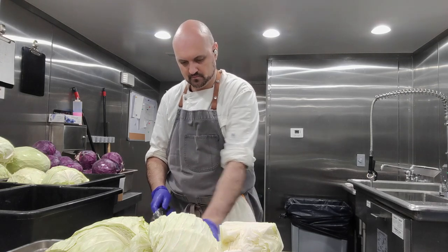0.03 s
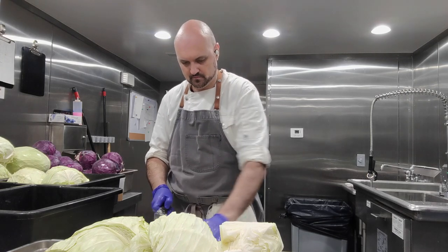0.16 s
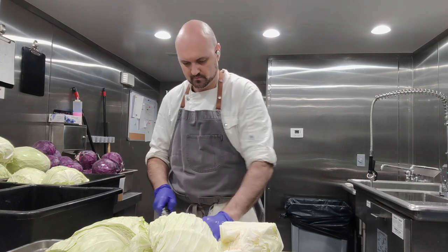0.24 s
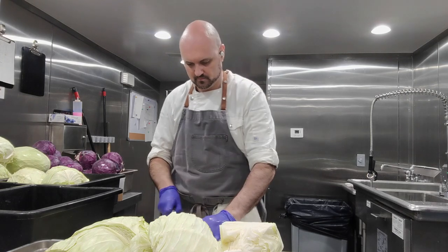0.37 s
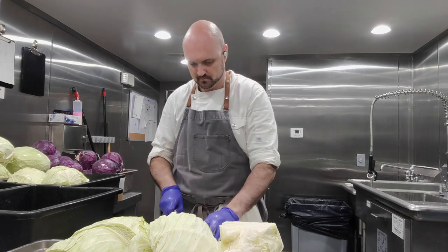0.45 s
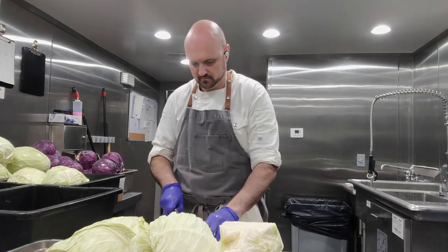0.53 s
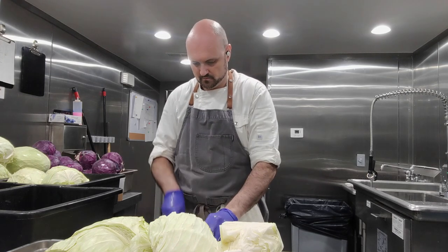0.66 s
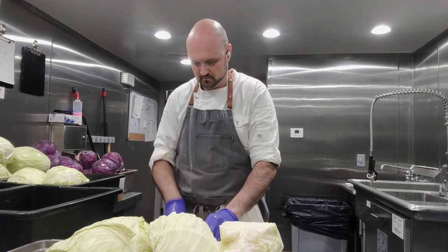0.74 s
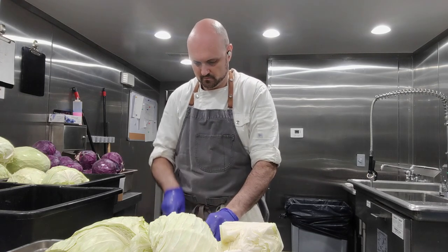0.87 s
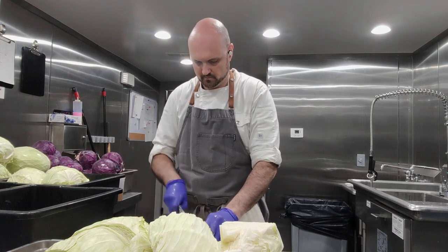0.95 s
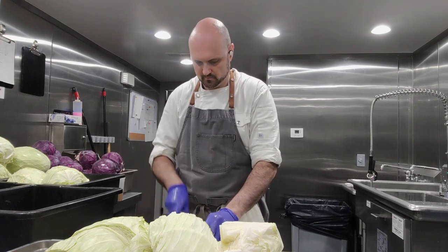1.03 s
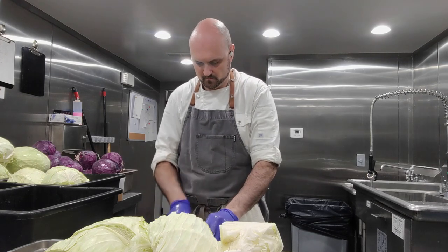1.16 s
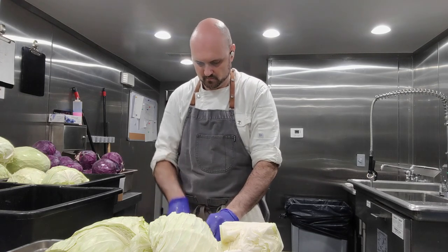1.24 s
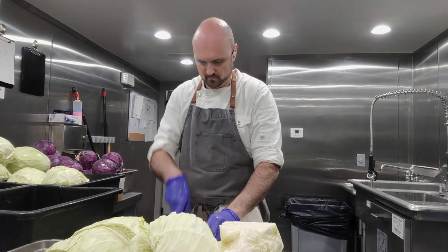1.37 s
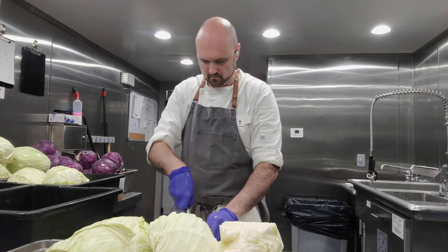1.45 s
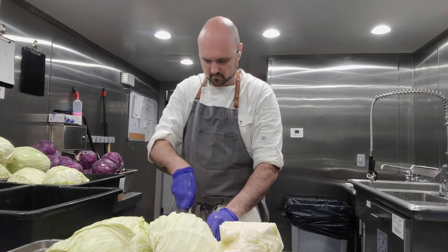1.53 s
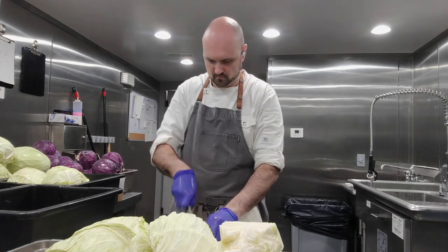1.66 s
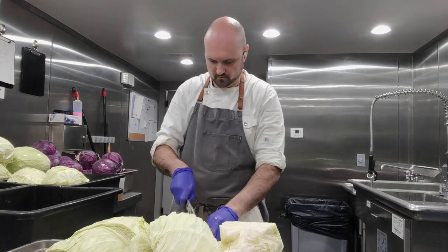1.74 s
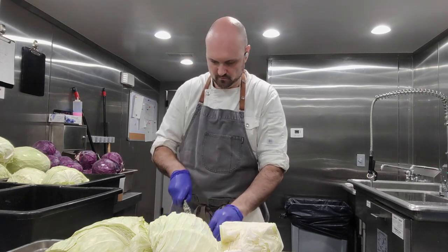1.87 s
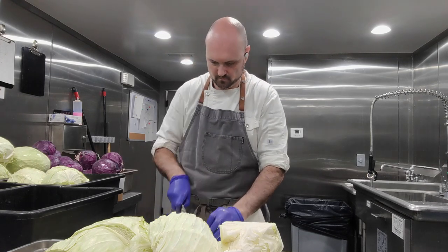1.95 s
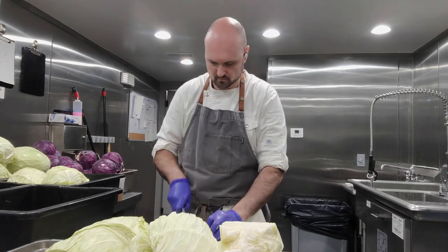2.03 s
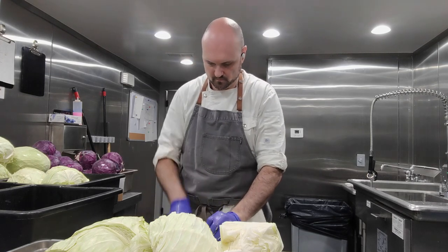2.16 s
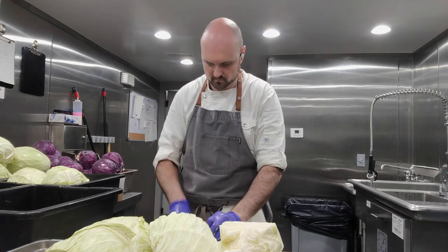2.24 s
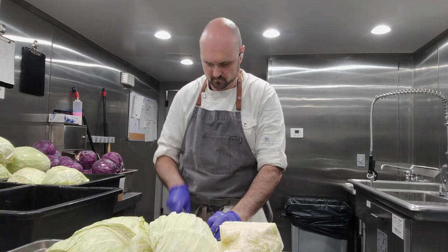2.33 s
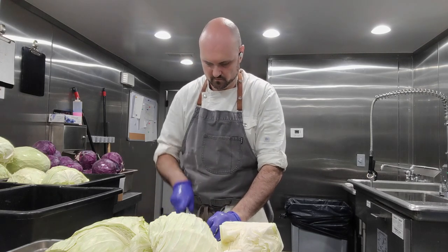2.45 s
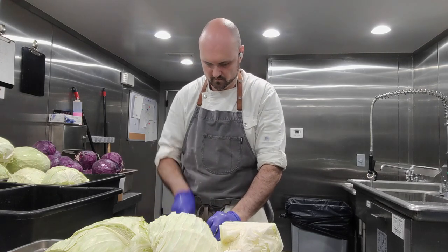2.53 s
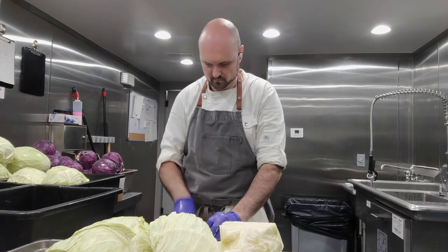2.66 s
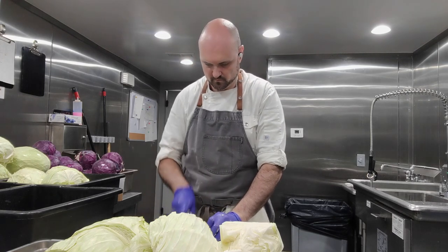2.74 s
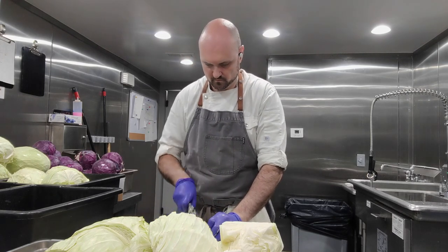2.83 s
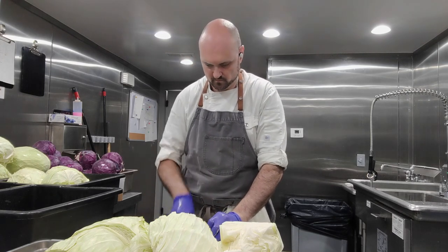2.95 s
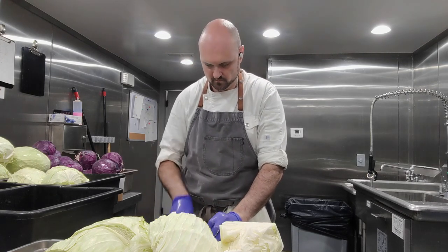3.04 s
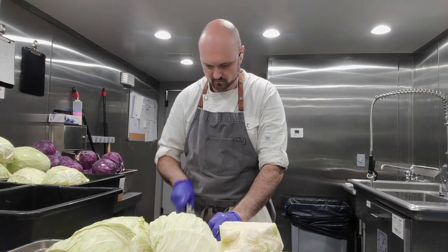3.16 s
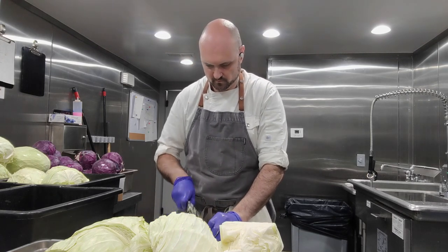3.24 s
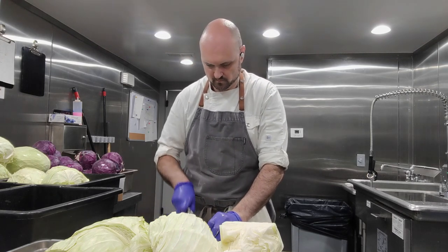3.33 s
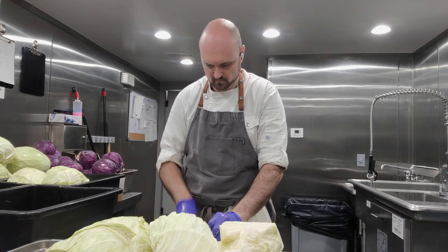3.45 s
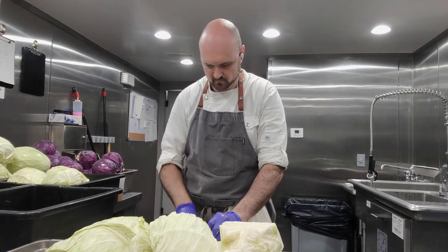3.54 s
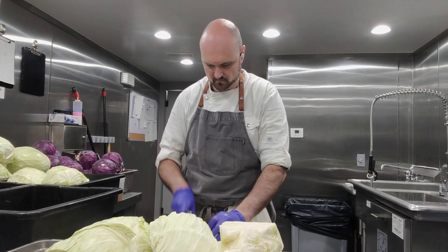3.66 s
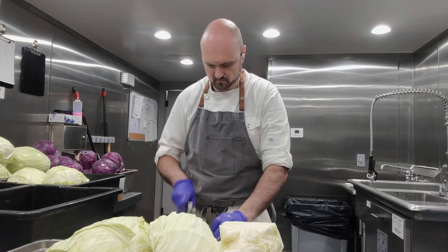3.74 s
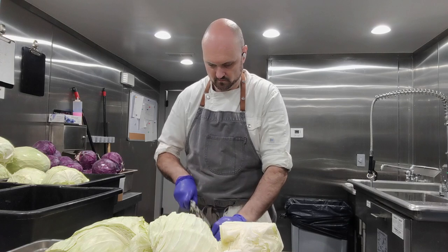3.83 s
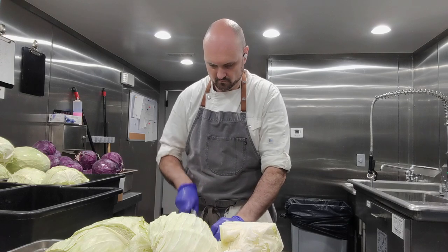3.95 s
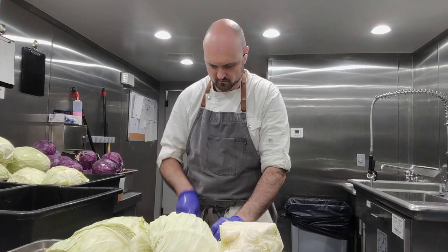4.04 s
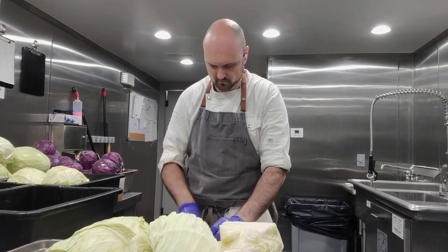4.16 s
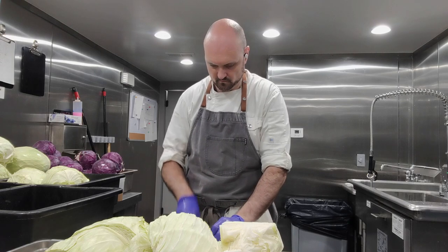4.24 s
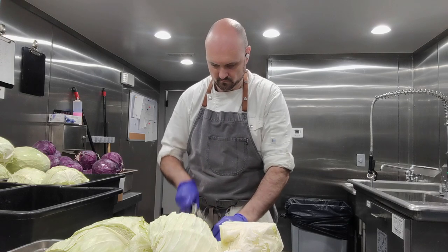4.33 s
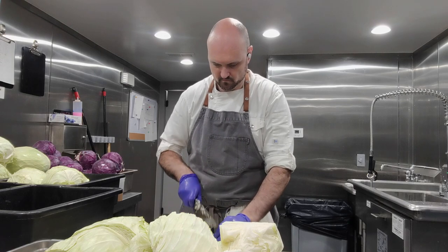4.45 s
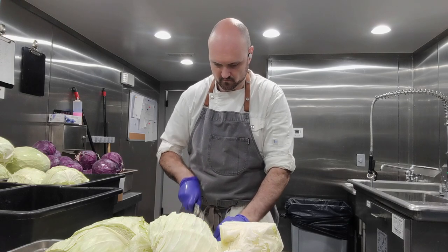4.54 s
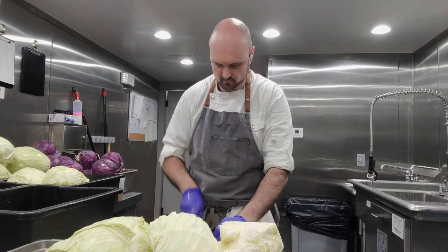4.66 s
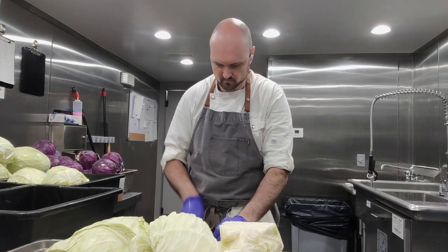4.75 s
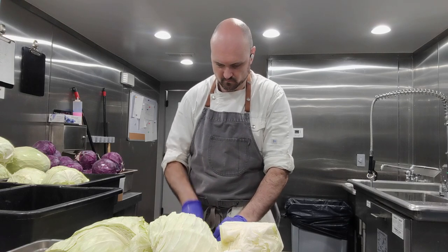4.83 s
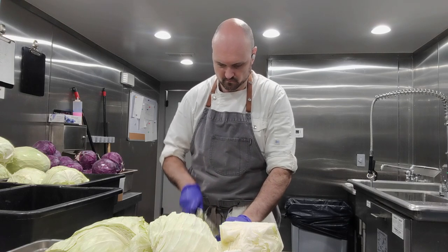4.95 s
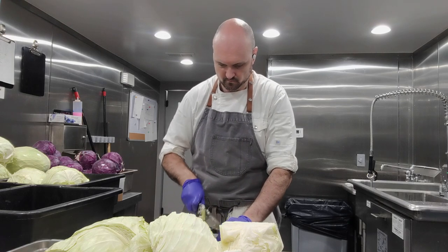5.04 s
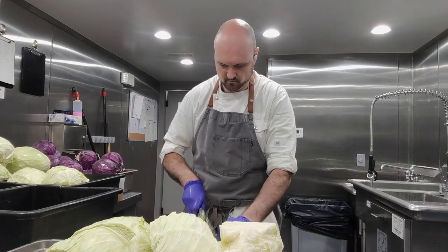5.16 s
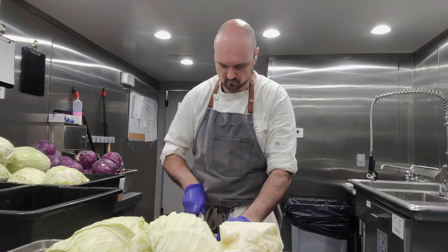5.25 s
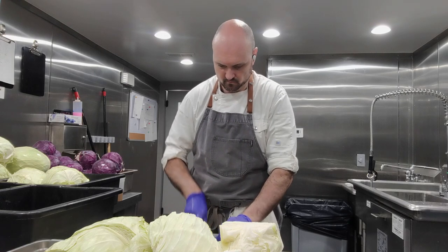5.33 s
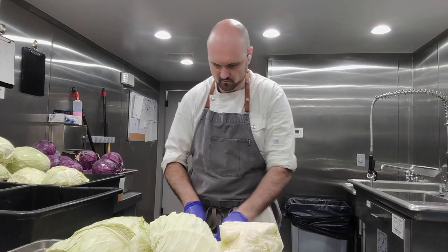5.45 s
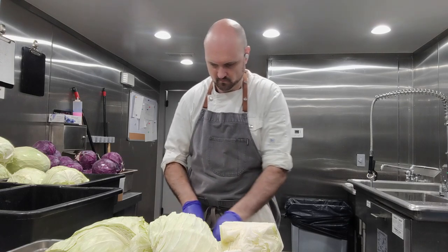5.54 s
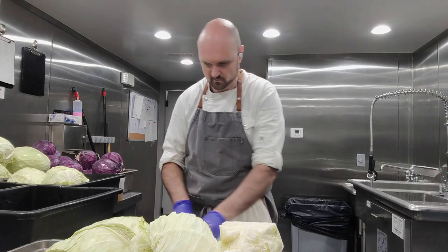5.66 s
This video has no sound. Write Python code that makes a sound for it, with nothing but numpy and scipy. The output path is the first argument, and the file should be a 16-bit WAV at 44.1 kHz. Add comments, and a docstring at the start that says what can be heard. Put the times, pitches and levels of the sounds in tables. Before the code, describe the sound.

Nine crunchy cabbage cuts land with woody thuds on a cutting board in a small reflective kitchen with humming fans and compressor.

```python
"""A chef's knife goes through a cabbage in a small steel-lined kitchen, over steady hum, fan tones and air noise.
First the cabbage rustles over the board: a fine crackle of tiny clicks. Then come nine strokes in about five
seconds, each a dense run of bursting cells (random clicks that change level and brightness), with single leaves
snapping here and there and a dull knock on the board at the end, made of a noise thud and decaying tones.
After the first stroke the blade squeaks faintly (a wavering tone); two soft slides follow the second stroke."""
import sys
import numpy as np
from scipy import signal
from scipy.fft import rfft, irfft, next_fast_len
from scipy.io import wavfile
from scipy.ndimage import uniform_filter1d

SR = 44100
rng = np.random.default_rng(int(sys.argv[2]) if len(sys.argv) > 2 else 0)


def file_out(sig):
    """Save sig as 16-bit WAV at sys.argv[1]."""
    # one column per channel
    cols = np.atleast_2d(sig).T
    # limit, then scale
    lim = np.clip(cols, -1, 1)
    pcm = np.round(lim * 32767).astype(np.int16)
    wavfile.write(sys.argv[1], SR, pcm)


N = 251034
TIME = np.arange(N) / SR  # seconds

# The blade's way through the cabbage: bites in at t/s, length/s, outer leaves level/dB, heart level/dB,
# depth of the heart (0-1), bottom leaves level/dB, brightness at the top/dB, brightness at the bottom/dB
STROKES = [(0.656, 0.12, -46, -41, 0.4, -68, 0.5, 2), (1.098, 0.096, -39, -38.5, 0.82, -48, 2.5, 1.5),
           (2.09, 0.15, -46, -42.5, 1, -44, 0, 4), (2.55, 0.102, -43.5, -34.5, 0.6, -36, 4.5, -2),
           (2.965, 0.095, -41.5, -41.5, 0.16, -56, 2.5, -2), (3.412, 0.137, -44.5, -35.5, 0.45, -37, 3, -2),
           (4.045, 0.134, -42.5, -35, 0.32, -54, 0.5, 1), (4.69, 0.141, -45.5, -40, 0.88, -43.5, 4, 0),
           (5.312, 0.12, -57, -40, 0.78, -49, 5, 0)]
# Leaves snapping as the blade is set on, lifted off or parts the pieces: t/s, level/dB, brightness/dB
LEAF_SNAPS = [(0.811, -45, 7.5), (1.519, -43, 5.5), (2.008, -54.5, 4.5), (2.03, -48.5, -3), (3.36, -56, 3),
              (3.974, -48, 2.5), (4.63, -46.5, -2.5), (4.865, -39.5, 2), (5.266, -49, 0.5), (5.45, -36, 0),
              (5.495, -38.5, 3), (5.591, -40.5, -3), (5.635, -47, -3)]
# The blade meets the board: t/s, level/dB, table thump/dB, board boom/dB, board ring/dB, edge hardness/dB
BOARD_KNOCKS = [(0.785, -2.5, -3, 2, -0.5, -1), (1.2004, -1.5, 1.5, 5.5, 1.5, 2),
                (2.228, -2, 3.5, 7.5, 1.5, 0.5), (2.658, 1.5, 1, 2, 3, 2.5), (3.062, -4, 0.5, 1, -1, -4.5),
                (3.549, -2.5, 2, 3.5, 0.5, -1), (4.178, 1, 3.5, 0.5, -2.5, 1.5),
                (4.831, -2.5, 4, 2, -5.5, -2.5), (5.416, 0, 1, 0, -6.5, -3)]
# The cabbage slid over the board: fastest at t/s, level/dB, brightness/dB
CABBAGE_SLIDES = [(0.275, -46, -5), (1.47, -60, -2), (1.82, -61.5, -2.5)]
# What the board and its table ring with: f/Hz, level/dB, time to lose 60 dB/s
BOARD_RINGS = [(68, -7.5, 0.47), (191, 4, 0.29), (200, 2.5, 0.36), (252, 2, 0.31), (274, 3.5, 0.32),
               (307, -31, 0.28), (348, -7, 0.38), (400, -12.5, 0.61), (422, 3, 0.46), (446, -2.5, 0.73),
               (495.5, -7.5, 0.56), (557, -9, 0.39), (613, 0, 0.21), (706, 5.5, 0.18), (761, -23, 0.16),
               (788, 4.5, 0.22), (813, 2.5, 0.45), (870, -24, 0.3), (921, -14, 0.4), (990, -24, 0.26),
               (1130, -15, 0.25), (1370, -31, 0.43)]
# Colour of the short thud of the blow: f/Hz, level/dB
THUD_COLOUR = [(25, -56), (55, -4), (100, -6), (160, 2), (240, -1), (340, 1), (450, 1), (650, -2),
               (770, 7.5), (880, -4.5), (1050, -5.5), (1300, -13.5), (1800, -20.5), (8000, -48)]
# Colour of bursting leaf cells: f/Hz, level/dB
CRUNCH_COLOUR = [(100, -40), (400, -9), (800, -3), (1500, -2), (2000, -2.5), (2700, -2.5), (3700, 0.3),
                 (5000, 0), (6500, -1.5), (8400, -1), (10000, -2.5), (12000, -5), (15000, -12)]
# Colour of leaves rubbing on the board: f/Hz, level/dB
RUB_COLOUR = [(100, -21), (600, -1), (1500, 0), (2500, -2.5), (4500, 1), (7000, -1.5), (9000, -1.5),
              (12000, -5), (15000, -16)]
# Strong returns from ceiling and steel walls: delay t/s, level/dB
WALL_ECHOES = [(.0032, -12.5), (.0063, -3), (0.0113, -5), (0.016, -2.5), (0.0347, -3), (.0385, -4),
               (0.065, -11)]
# Colour of the extractor fan's air: f/Hz, level/dB
AIR_COLOUR = [(20, -39), (32, -56), (54, -37), (70, -32), (95, -31.5), (180, -30), (255, -33.5), (310, -43),
              (500, -41.5), (1000, -43.5), (1300, -49.5), (1700, -59.5), (3000, -63.5), (9000, -75)]
# Fan and compressor tones: f/Hz, level/dB
MACHINE_TONES = [(54, -68), (133, -61.5), (179, -63.5), (267.5, -60.5), (339, -71), (400, -71.5),
                 (533, -87.5), (894, -74), (985, -70.5), (1378, -94)]
# The microphone port resonates and then rolls off: f/Hz, level/dB
MIC_COLOUR = [(20, -0.5), (6500, -0.5), (7500, 1.5), (8300, 6), (8800, 5), (9500, -3), (10500, -9),
              (12000, -14), (16000, -10.5)]

HUM_HZ, HUM_DB = 119.97, -41.5  # pitch and rms level of the hum
TOP_HZ = 15500  # upper edge of the sound
BITE_S = 0.011  # time constant with which the edge sinks in
BITE_BRIGHT_DB = 5.5  # the first nick is thin and sharp
HEART_SAG_DB_PER_S = 47  # the crunch eases once the heart has split
STOP_T60_S = 0.17  # the last fractures die away once the blade is down
BEDDED_BRIGHT_DB = -14.5  # with the blade buried and resting on the board
PINCH_LEAD_S, PINCH_S = 0.011, 0.0094  # bottom leaves are pinched just before the stroke ends
SLIDE_RISE_DB_PER_S, SLIDE_FALL_DB_PER_S = 78, 105  # each push gathers speed and comes to rest


def cutting():
    """The edge bursts cells in clusters, one for each leaf that it passes; thick ribs crack in between."""
    clusters = undb(2.8 * walk(rate=110))
    cells = unit(crackle(rate=3000, spread_db=4.5) * clusters)
    rib_colour = [(500, -13.5), (2500, 1.5), (5000, -3), (12000, -5.0)]  # f/Hz, level/dB
    ribs = unit(colour(crackle(rate=130, spread_db=4.0), rib_colour))
    moves = [stroke(*row) for row in STROKES]
    return undb(-0.4) * play(cells + undb(-6.5) * ribs, moves, flutter_db=2.0)


def stroke(s, length, outer_db, heart_db, heart_depth, bottom_db, top_bright_db, bottom_bright_db):
    """The crunch goes from outer leaves to heart, shifts colour with depth and ends with the bottom leaves."""
    t = TIME - s
    heart_s = length * np.clip(heart_depth, .05, 1)
    db = np.interp(t, [0, heart_s], [outer_db, heart_db])
    db = db - HEART_SAG_DB_PER_S * np.maximum(t - heart_s, 0)
    bite = np.exp(np.minimum(t, 0) / BITE_S)  # rises to 1 at the moment s
    moving = fade(np.maximum(t - length, 0), STOP_T60_S)  # 1 until the stroke ends, then fades
    pinch = undb(bottom_db) * np.exp(-((t - length + PINCH_LEAD_S) / PINCH_S) ** 2)
    leaf_bright_db = np.interp(t, [0, length], [top_bright_db, bottom_bright_db])
    bright_db = (1 - bite) * BITE_BRIGHT_DB + moving * leaf_bright_db + (1 - moving) * BEDDED_BRIGHT_DB
    return bite * moving * undb(db) + pinch, bright_db


def snapping():
    """A leaf gives way in a short spurt of fractures that starts at once and dies away."""
    out = np.zeros(N)
    cells = crackle(rate=9000, spread_db=3)
    for s, db, bright_db in LEAF_SNAPS:
        spurt = (TIME >= s) * fade(np.abs(TIME - s), t60=0.13)
        out += undb(db) * spurt * brighten(cells, bright_db)
    return colour(out, [(1000, -1), (3000, -1.8), (5000, -0.24), (12000, 1)])


def knocking():
    """Each stroke ends on the board: a thud thrown about the room, and the ring of board and table."""
    t, out = TIME[:SR], np.zeros(N)
    # complex tones, so that each blow can set its own phases
    modes = np.array([undb(db) * fade(t, t60) * np.exp(2j * np.pi * hz * t) for hz, db, t60 in BOARD_RINGS])
    for s, db, thump_db, boom_db, ring_db, hard_db in BOARD_KNOCKS:
        # the edge beds into the board along its length over a few milliseconds
        thud = colour(diffuse(t60=.014, treble_t60=.025, build_s=0.00012, size=80), THUD_COLOUR)
        blow = kitchen(thud, direct_db=-10.0, echo_db=-8.5, tail_db=-1.5,
                       t60=0.5, treble_t60=0.27, build_s=0.0017)
        # each spot on the board shares the blow differently among the modes
        shares = undb(1.0 * rng.standard_normal(len(modes)))
        phases = np.exp(2j * np.pi * rng.random(len(modes)))
        ring = ((shares * phases) @ modes).imag * (1 - np.exp(-t / 0.011))
        # where and how squarely the edge lands decides which range it drives
        contact = [(200, thump_db), (245, boom_db), (275, boom_db), (330, -0.36),
                   (580, -0.076), (720, ring_db), (830, ring_db), (1050, hard_db)]
        knock = colour(undb(15) * blow + undb(-37.0) * ring, contact)
        add(out, undb(db) * knock, s)
    return out


def sliding():
    """Cut leaves drag over the board with a fine, even rustle of tiny clicks."""
    moves = [shove(*row) for row in CABBAGE_SLIDES]
    return colour(play(crackle(rate=9000, spread_db=3), moves, flutter_db=1.5), RUB_COLOUR)


def shove(s, db, bright_db):
    """One push of the hand: the rustle rises to its fastest moment and falls away."""
    drop_db = np.maximum(SLIDE_RISE_DB_PER_S * (s - TIME), SLIDE_FALL_DB_PER_S * (TIME - s))
    return undb(db - drop_db), bright_db


def squeak(s=0.9, length=0.14, edge_s=0.0066, hz=4540, db=-60, t60=0.44):
    """The wet blade squeaks faintly, with unsteady pitch, as it is drawn out of the cut."""
    pitch = hz * (1 + .015 * walk(rate=600))
    tone = np.sin(2 * np.pi * np.cumsum(pitch) / SR)
    t = np.clip(TIME - s, 0, length)
    edges = np.minimum(np.minimum(t, length - t) / edge_s, 1)  # soft start and end
    pressure = edges * fade(t, t60)
    return undb(db) * pressure * tone


def machines():
    """Steady mains hum of the compressor, wavering fan and compressor tones, and rushing air as noise."""
    hum = undb(HUM_DB) * np.sin(2 * np.pi * HUM_HZ * TIME)
    for hz, db in MACHINE_TONES:
        level = undb(db + 2 * walk(rate=4.2))
        hum += level * np.sin(2 * np.pi * hz * TIME + 0.68 * walk(rate=5))
    air = colour(rng.standard_normal(N), AIR_COLOUR) * undb(.5 * walk(rate=4))
    return np.sqrt(2) * hum + air  # the root of 2 turns rms levels into sine peaks


def kitchen(x, direct_db, echo_db, tail_db, t60, treble_t60, build_s):
    """Direct sound, a few hard returns and the diffuse ring of the room, from one spot on the board."""
    response = undb(tail_db) * diffuse(t60, treble_t60, build_s)
    response[0] += undb(direct_db)
    for s, db in WALL_ECHOES:
        delay_s = s + .0003 * rng.standard_normal()  # differs a little from spot to spot
        response[int(delay_s * SR)] += undb(db + echo_db)
    return signal.fftconvolve(x, response)[:len(x)]


def diffuse(t60, treble_t60, build_s, size=24):
    """A dense decaying noise burst of energy 1, spread evenly over frequency; treble has its own decay."""
    t = TIME[:SR]
    noise = rng.standard_normal(SR)
    treble_share = np.clip(np.arange(SR // 2 + 1) / TOP_HZ, 0, 1) ** 2
    treble = irfft(rfft(noise) * treble_share, SR)
    decaying = (noise - treble) * fade(t, t60) + treble * fade(t, treble_t60)
    spectrum = rfft(decaying * (1 - np.exp(-t / build_s)))
    local_power = uniform_filter1d(np.abs(spectrum) ** 2, size)
    tail = irfft(spectrum / np.sqrt(local_power), SR)
    return unit(tail * (t < .8)) / np.sqrt(SR)


def play(grains, moves, flutter_db):
    """Grains led through (gain, brightness dB) moves over time; the colour also shifts by slow chance."""
    gain = sum(g for g, bright in moves)
    bright_db = sum(g * bright for g, bright in moves) / (gain + 1e-12)  # the louder move counts more
    return gain * brighten(grains, bright_db + flutter_db * walk(rate=82))


def crackle(rate, spread_db):
    """Random tiny fractures, rate of them a second on average, many small and a few large; rms 1."""
    chance, size, push = rng.random(N), rng.exponential(size=N), rng.choice([-1, 1], N)
    height = undb(spread_db * np.minimum(size, np.pi))
    return unit((chance < rate / SR) * push * height)


def brighten(x, db, low_hz=3000, high_hz=7000):
    """See-saw tilt: positive dB lifts the treble and lowers the bass, as thin leaves sound brighter."""
    f = np.fft.rfftfreq(N, 1 / SR) + 1  # 1 Hz up, so there is no division by zero
    low = irfft(rfft(x) / (1 + (f / low_hz) ** 6), N)
    high = irfft(rfft(x) / (1 + (high_hz / f) ** 6), N)
    return x - low - high + low * undb(-db) + high * undb(db)


def walk(rate):
    """Slow chance: random levels held 1 / rate s and smoothed twice; spread near 1."""
    k = int(SR / rate)
    steps = np.repeat(rng.standard_normal(N // k + 1), k)
    smooth = uniform_filter1d(uniform_filter1d(steps, k), k)
    return unit(smooth)[:N]


def colour(x, points):
    """Filter through (f/Hz, level/dB) points that never sounds early, made from the cepstrum of the log gain."""
    size = next_fast_len(len(x) + SR // 2, True) * 2
    hz, db = np.transpose(points)
    log_f = np.log(np.fft.rfftfreq(size, 1 / SR) + 1)
    cepstrum = irfft(np.log(undb(np.interp(log_f, np.log(hz), db))))
    # fold the backward half onto the forward half
    cepstrum[1:size // 2] *= 2
    cepstrum[size // 2 + 1:] = 0
    return irfft(rfft(x, size) * np.exp(rfft(cepstrum)))[:len(x)]


def undb(db):
    """Decibels to gain."""
    return 10 ** (np.asarray(db) / 20)


def unit(x):
    """Scale to rms 1."""
    return x / np.sqrt(np.mean(x ** 2))


def fade(t, t60):
    """Exponential decay that loses 60 dB in t60 seconds."""
    return np.exp(-np.log(1000) * t / t60)


def add(out, x, s):
    """Mix x into out from time s on."""
    i = max(int(s * SR), 0)
    out[i:i + len(x)] += x[:max(len(out) - i, 0)]


def scene(count=5):
    """Leaves, blade and board in the ringing kitchen, over the machines."""
    cracks = cutting() + snapping()
    # fractures hop between spots along the blade, each with its own paths round the room
    spot = np.repeat(rng.integers(count, size=N), 64)[:N]
    # piled cabbages stand between board and microphone, so most of the crunch arrives by the walls
    crunch = sum(kitchen(cracks * (spot == k), direct_db=-9.5, echo_db=-10, tail_db=-1.46,
                         t60=0.49, treble_t60=0.16, build_s=0.0043) for k in range(count))
    rustle = kitchen(sliding() + squeak(), direct_db=-6.0, echo_db=-15, tail_db=0.2,
                     t60=0.38, treble_t60=0.22, build_s=0.003)
    return (colour(crunch, CRUNCH_COLOUR) + rustle + knocking() + machines())[None]


def record(dry):
    """Microphone colour, a trace of preamplifier hiss and a steep top cut."""
    heard = colour(dry[0], MIC_COLOUR) + undb(-78) * rng.standard_normal(N)
    top_cut = signal.ellip(10, .2, 80, TOP_HZ, fs=SR, output="sos")
    return signal.sosfilt(top_cut, heard)[None]


dry = scene()
out = record(dry)
file_out(out)
```